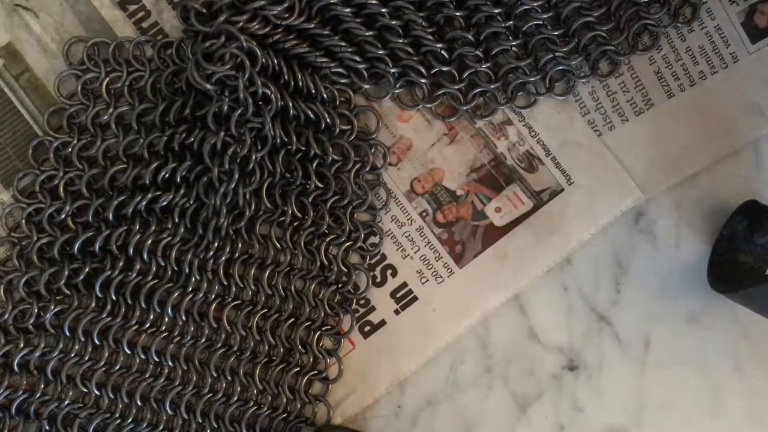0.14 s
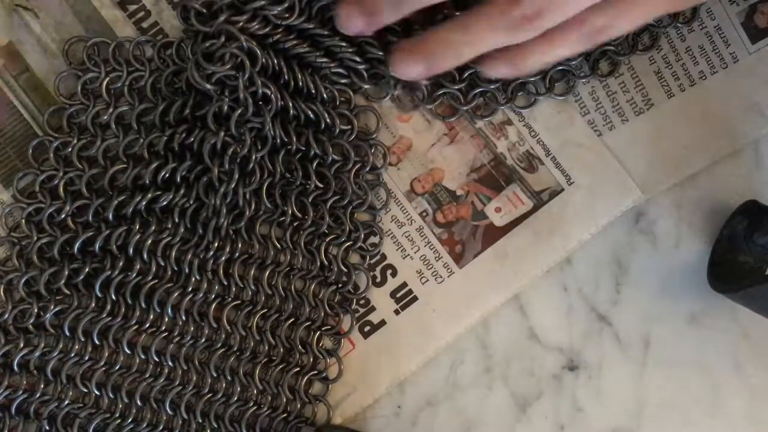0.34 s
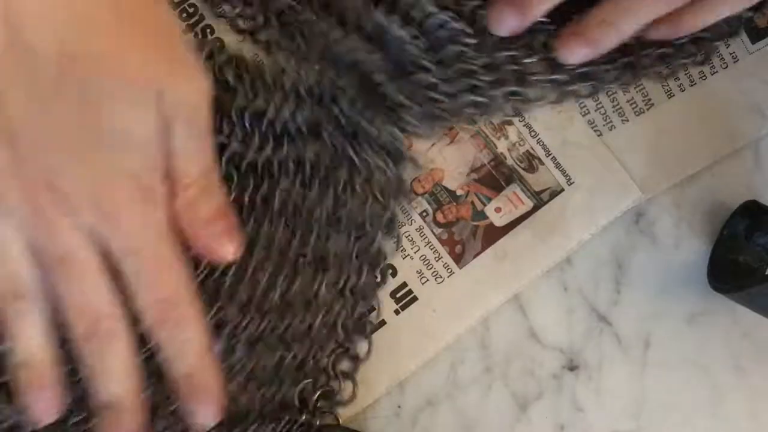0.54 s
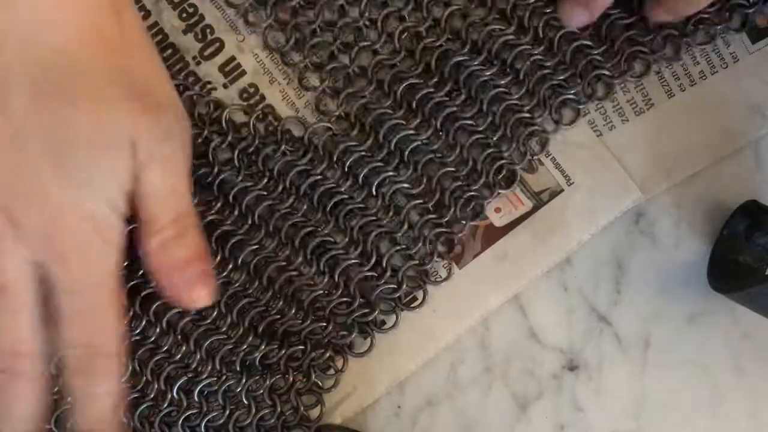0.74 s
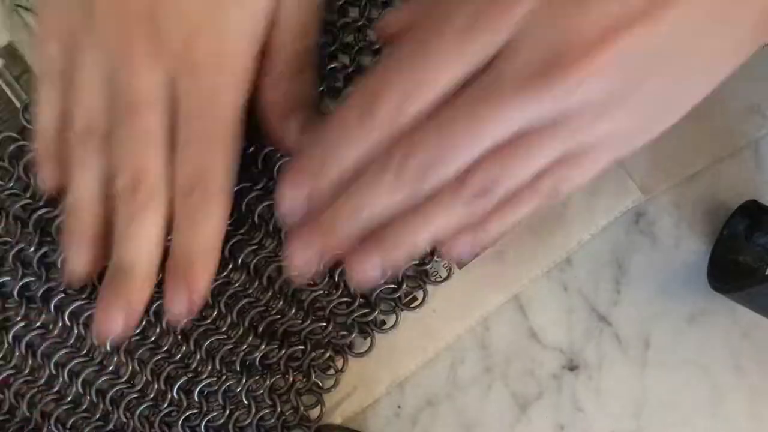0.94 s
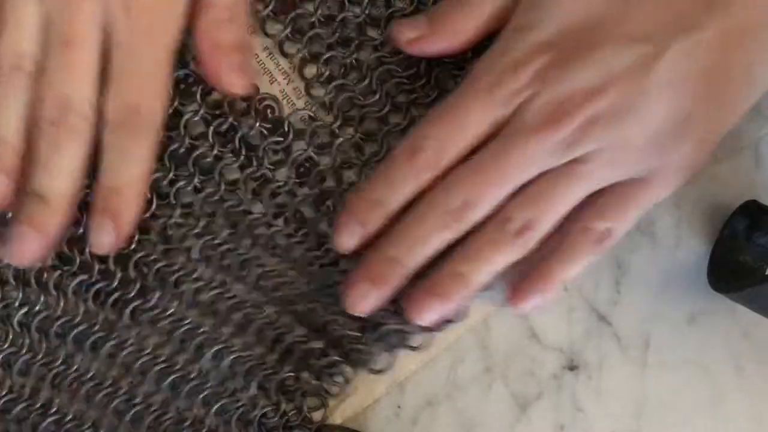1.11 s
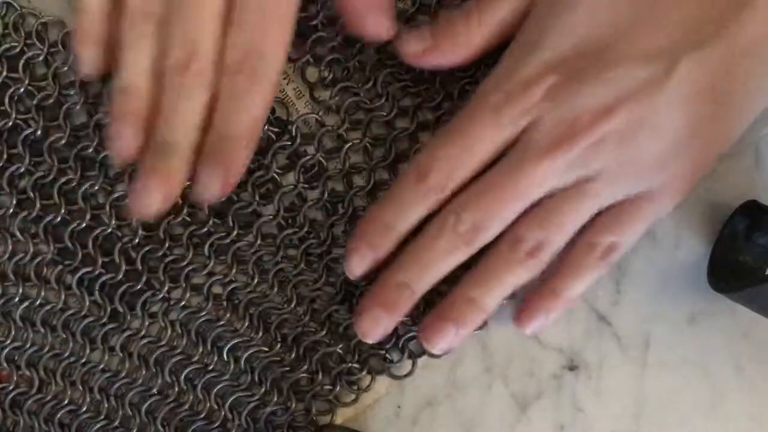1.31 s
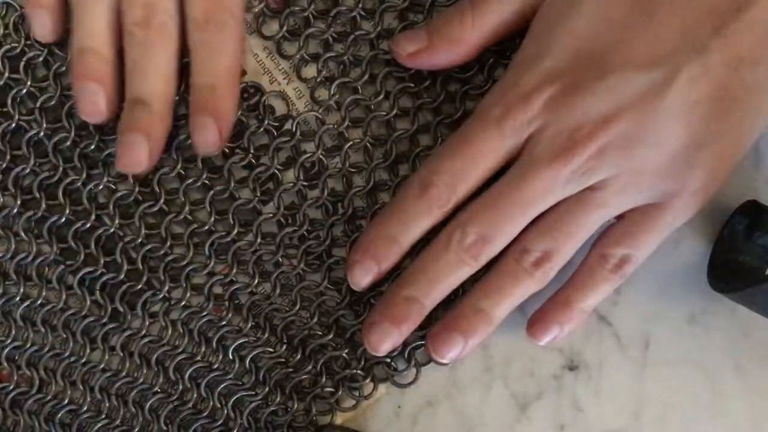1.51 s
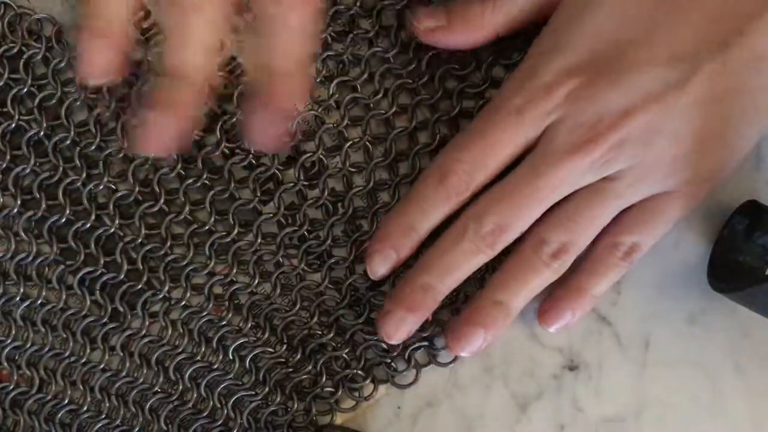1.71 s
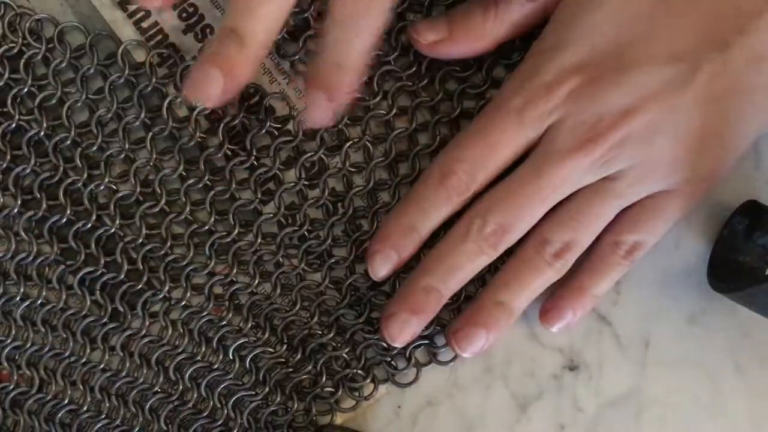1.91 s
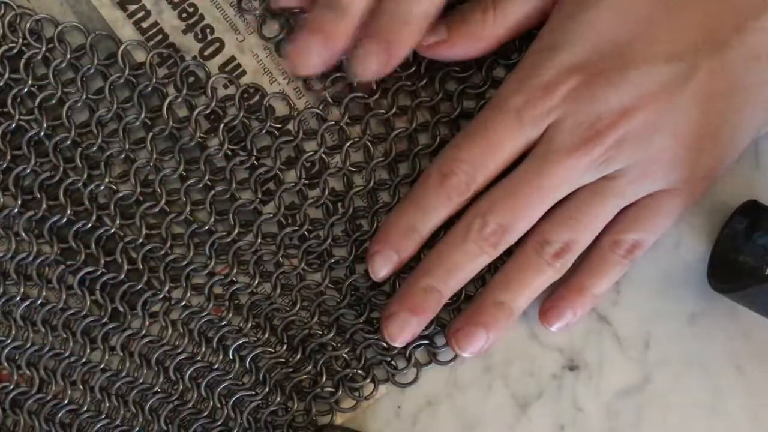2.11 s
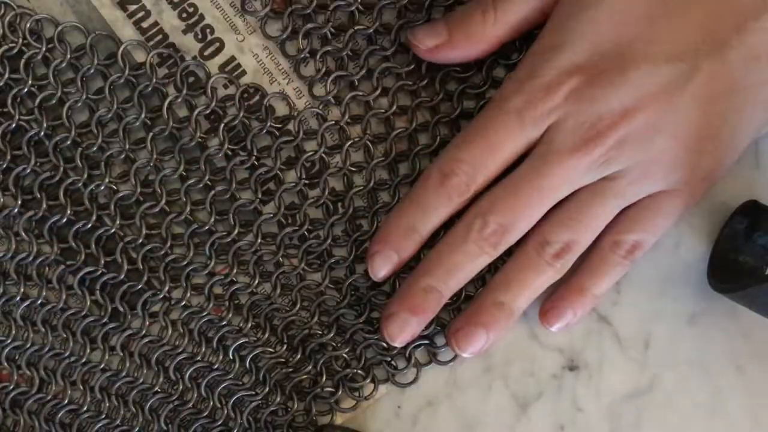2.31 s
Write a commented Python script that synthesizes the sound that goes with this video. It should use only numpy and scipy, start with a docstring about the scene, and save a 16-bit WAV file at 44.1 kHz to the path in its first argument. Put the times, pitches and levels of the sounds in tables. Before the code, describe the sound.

Chain mail drops with a metallic clack, then rustles and clicks as hands spread it.

```python
"""Hands spread chain mail over newspaper on a stone counter, close by in a small room with a faint hum.
A few rings click, then a fold of mesh drops at 0.24 s: steel clacks, the counter thuds, the rings rattle.
From 0.45 s three strokes drag the mesh: ring contacts hiss, the paper rustles, palms press down softly.
Links scrape, clink and slip along the way; at 2.23 s one taut ring snaps into place."""
import sys
import numpy as np
from scipy import signal
from scipy.fft import rfft, irfft, next_fast_len
from scipy.io import wavfile

SR = 44100
rng = np.random.default_rng(int(sys.argv[2]) if len(sys.argv) > 2 else 0)


def store_wav(level_fs):
    """Save 16-bit WAV to argv[1]."""
    pcm = np.round(np.clip(np.atleast_2d(level_fs), -1, 1) * 32767)
    wavfile.write(sys.argv[1], SR, pcm.T.astype(np.int16))


N = 103635

# Spectra. Each row: frequency in Hz, relative level in dB.
RUB_SPECTRUM = [(1200, -32.5), (3000, -13.5), (5000, -13), (6700, -3.5), (7400, -10), (8500, -3),
                (9700, -2), (10300, -10), (11400, -0.5), (12200, -2.5), (12750, 2), (13600, -2),
                (15500, -4)]  # rings rubbing
PAPER_SPECTRUM = [(250, -1), (600, 3), (1000, -2.5), (1900, 1), (3300, -0.5), (4800, -6.5), (8000, -9),
                  (15000, -48.5)]  # newspaper rustling
CLICK_SPECTRUM = [(1000, -28.5), (3000, -11.5), (5000, -12), (7500, -4.5), (10200, -5), (11300, -1),
                  (12700, -1.5), (14000, -7), (16000, -8)]  # one ring striking others
CLATTER_SPECTRUM = [(500, -8.5), (1700, -4.5), (4300, -2.5), (5800, 2.5), (12000, -4.5), (15500, -14)]  # many rings striking together

LAND_S, SNAP_S = 0.2401, 2.2342
LAND_RISE_S, CLICK_RISE_S = 0.00049, 0.00044


def amp(db):
    """Decibels to gain."""
    return 10 ** (np.asarray(db) / 20)


def unit(x):
    """Scale to rms 1."""
    return x / np.sqrt(np.mean(x ** 2) + 1e-20)


def along(points, hz):
    """Interpolate (Hz, value) points on a log frequency axis."""
    point_hz, values = np.transpose(points)
    return np.interp(np.log(hz + 1), np.log(point_hz + 1), values)


def clock():
    """Sample times in seconds."""
    return np.arange(N) / SR


def noise():
    """White noise of rms 1."""
    return rng.standard_normal(N)


def colour(x, spectrum):
    """Minimum-phase filter from (Hz, dB) points; white noise keeps its power."""
    size = 2 * next_fast_len(N)
    gain = unit(amp(along(spectrum, np.fft.rfftfreq(size, 1 / SR))))
    cepstrum = irfft(np.log(gain + 1e-6))
    cepstrum[1:size // 2] *= 2
    cepstrum[size // 2 + 1:] = 0
    return irfft(rfft(x, size) * np.exp(rfft(cepstrum)))[:N]


def resonate(x, modes):
    """Parallel (Hz, width Hz, dB) resonances of alternating sign; white noise keeps its power."""
    size = 2 * next_fast_len(N)
    f = np.fft.rfftfreq(size, 1 / SR)
    body = sum((-1) ** k * amp(db) * 1j * f * width_hz / (hz * hz - f * f + 1j * f * width_hz)
               for k, (hz, width_hz, db) in enumerate(modes))
    return irfft(rfft(x, size) * body / np.sqrt(np.mean(np.abs(body) ** 2)), size)[:N]


def fade(t, t60_s):
    """Exponential decay from t = 0."""
    return np.exp(-np.log(1000) * np.maximum(t, 0) / t60_s)


def strike(start_s, rise_s, t60_s):
    """Impact envelope: exponential rise and decay."""
    t = np.maximum(clock() - start_s, 0)
    return (1 - np.exp(-t / rise_s)) * fade(t, t60_s)


def swell(peak_s, rise_s, t60_s):
    """Soft envelope: Gaussian rise, exponential decay."""
    t = clock() - peak_s
    return np.exp(-0.5 * (np.minimum(t, 0) / rise_s) ** 2) * fade(t, t60_s)


def swells(rows):
    """Power sum of swells."""
    power = sum((amp(db) * swell(peak_s, rise_s, t60_s)) ** 2 for peak_s, db, rise_s, t60_s in rows)
    return np.sqrt(power)


def contacts(per_s, spread_db):
    """Random tiny impacts of uneven size, with even mean power."""
    chance = np.clip(per_s / SR, 1e-4, 1)
    hits = (rng.random(N) < chance) * np.sign(noise())
    sizes = amp(spread_db * np.clip(noise(), -2, 2))
    return unit(hits * sizes / np.sqrt(chance))


def ringing(start_s, rise_s, modes):
    """Struck modes: decaying sines of random phase."""
    t = clock() - start_s
    return sum(amp(db) * strike(start_s, rise_s, t60_s) * np.sin(2 * np.pi * (hz * t + rng.random()))
               for hz, db, t60_s in modes)


def background():
    """Low room noise and mains hum."""
    # Each row: frequency in Hz, level in dB (relative for the air, rms for the hum).
    air_spectrum = [(25, -23), (70, -1), (110, -1.5), (150, -9), (220, -3.5), (420, -17), (800, -20),
                    (1700, -25), (4500, -35.5), (10000, -36.5), (15500, -45)]
    hum_lines = [(99, -67.5), (200, -75.5)]
    hum = sum(amp(db) * np.sqrt(2) * np.sin(2 * np.pi * (hz * clock() + rng.random()))
              for hz, db in hum_lines)
    return amp(-63.5) * unit(colour(noise(), air_spectrum)) + hum


def sliding():
    """Ring contacts hiss, denser as the mesh slides harder; the paper follows the same motion."""
    # The fold's slump, three strokes, small shifts. Each row: time in seconds, sliding level in dB.
    motion = [(0, -73), (.09, -70.5), (.17, -62), (0.199, -65.5), (.26, -47), (.31, -63), (.40, -72),
              (.45, -62.5), (0.525, -50.5), (.696, -47.5), (0.761, -52), (.784, -66.5), (.872, -67.5),
              (.9, -76.5), (1.055, -78.5), (1.072, -57.5), (1.096, -48), (1.115, -55), (1.176, -57),
              (1.218, -53.5), (1.27, -62.5), (1.295, -72), (1.4, -85), (1.44, -53), (1.47, -62),
              (1.6, -71.5), (1.71, -70.5), (1.76, -89.5), (1.95, -77.5), (2.001, -81), (2.35, -81.5)]
    full_slide_db, smooth_share = -44.5, 0.95
    slide_db = np.interp(clock(), *np.transpose(motion))
    effort_db = slide_db - full_slide_db
    grains = contacts(per_s=9600 * amp(1.96 * effort_db), spread_db=9)
    rub = np.sqrt(1 - smooth_share) * grains + np.sqrt(smooth_share) * noise()
    rings = colour(rub * amp(slide_db + 2), RUB_SPECTRUM)
    paper = colour(noise() * amp(-61 + 0.6 * effort_db), PAPER_SPECTRUM)
    return rings + paper


def clicks():
    """A ring snaps against its neighbours and taps the counter; the neighbours rattle on."""
    # Each row: start in seconds, bright level in dB, dull level in dB.
    events = [(0.053, -37.5, -42.5), (.175, -46, -56), (0.214, -44, -47), (0.2349, -29.5, -46),
              (0.24, -20, -28.5), (0.2529, -35, -45), (0.265, -27.5, -42), (0.4278, -46.5, -38.5),
              (.902, -65.5, -57), (1.084, -49, -56), (1.0938, -38.5, -44), (1.4312, -45, -43.5),
              (1.697, -47.5, -76.5), (1.8092, -52, -58), (1.877, -43.5, -51.5), (2.2342, -43.5, -40.5)]
    # Dull tap on the counter. Each row: frequency in Hz, relative level in dB.
    tap_spectrum = [(100, -15.5), (250, 12), (600, -8.5), (950, 4.5), (1700, 1), (2300, 5), (4200, -1.5),
                    (7000, -8), (15000, -42.5)]
    bright, dull = np.zeros(N), np.zeros(N)
    for start_s, bright_db, dull_db in events:
        rattle = amp(-17.5) * strike(start_s, CLICK_RISE_S, t60_s=0.031)
        envelope = strike(start_s, CLICK_RISE_S, t60_s=0.012) + rattle
        bright += amp(bright_db) * envelope
        dull += amp(dull_db) * envelope
    ticks = colour(bright * np.sign(noise()), CLICK_SPECTRUM)
    return ticks + colour(dull * np.sign(noise()), tap_spectrum)


def counter():
    """Hard landings ring the counter's low modes over a diffuse thud; resting hands shorten the ring."""
    # Each row: start in seconds, level in dB, share of the free decay time.
    knocks = [(0.24, -32.5, 1), (0.273, -49.5, 0.85), (0.43, -46, 0.85), (2.2344, -50.5, .45)]
    # Each row: frequency in Hz, relative level in dB, free t60 in seconds.
    stone_modes = [(90.7, -5, 0.33), (163.2, -14, 0.53), (205.6, -10.5, 0.56), (238.8, -7.5, .35),
                   (266.5, -2, 0.31), (303.4, -5.5, .15), (574, -11.5, 0.11)]
    # Each row: frequency in Hz, relative level in dB.
    thud_spectrum = [(30, -35), (80, 3), (260, -2), (370, -1.5), (460, -13.5), (700, -16), (1500, -20.5),
                     (6000, -81)]
    ring, thud = np.zeros(N), np.zeros(N)
    for start_s, db, share in knocks:
        damped = [(hz, mode_db, t60_s * share) for hz, mode_db, t60_s in stone_modes]
        ring += amp(db) * ringing(start_s, rise_s=0.00021, modes=damped)
        thud += amp(db - 7.5) * strike(start_s, rise_s=0.00081, t60_s=0.49 * share)
    return ring + colour(thud * noise(), thud_spectrum)


def clack():
    """The fold lands with a broad crack."""
    envelope = strike(LAND_S, LAND_RISE_S, t60_s=0.0075)
    return amp(-15) * colour(np.sign(noise()) * envelope, CLATTER_SPECTRUM)


def steel():
    """Ring modes struck by the landing and by the last snap, choked at once by the mesh."""
    # Each row: frequency in Hz, relative level in dB, t60 in seconds.
    landing_modes = [(1680, -18.5, 0.014), (2220, -10, 0.006), (3375, -7.5, 0.009), (5155, -1.5, .007),
                     (5420, 2, 0.0091), (6180, -10, 0.012), (6500, -8.5, 0.0092), (8250, -3.5, 0.0082),
                     (9000, 2, 0.0059), (11160, -8.5, .007), (11400, -6, 0.0075)]
    taut_modes = [(2356, -8.5, 0.01), (4110, -7, 0.0072), (5680, -1, 0.0077), (7820, -0.5, 0.0078),
                  (12500, 3.5, 0.0096)]
    landing = amp(-9.5) * ringing(LAND_S, LAND_RISE_S, landing_modes)
    return landing + amp(-30) * ringing(SNAP_S, CLICK_RISE_S, taut_modes)


def settle():
    """The landed rings rattle as they come to rest."""
    rattle = strike(LAND_S, rise_s=0.002, t60_s=0.3) * contacts(per_s=5000, spread_db=5.5)
    return amp(-42.5) * colour(rattle, CLATTER_SPECTRUM)


def scuffs():
    """The newspaper crinkles briefly where the mesh or a finger catches it."""
    # Each row: peak time in seconds, level in dB, rise in seconds, t60 in seconds.
    events = [(.247, -42, 0.0031, 0.35), (1.09, -60, 0.014, 0.11), (1.4, -62.5, 0.012, 0.33),
              (1.438, -56.5, 0.005, 0.075), (2.08, -69, 0.01, .2)]
    return colour(swells(events) * contacts(per_s=4100, spread_db=4.5), PAPER_SPECTRUM)


def clunks_and_scrapes():
    """Hollow clunks and clatter as the mesh lands, then short scrapes as it is dragged."""
    # Each row: peak time in seconds, level in dB, rise in seconds, t60 in seconds.
    events = [(.273, -38, 0.00056, 0.018), (.299, -61, 0.0015, .06), (.43, -48, .0007, 0.054),
              (.575, -57, 0.0031, 0.25), (.70, -60, 0.02, 0.35), (.97, -68.5, 0.016, 0.56),
              (1.615, -59, 0.011, 0.26), (1.885, -67.5, 0.0065, 0.34)]
    # Each row: frequency in Hz, width in Hz, relative level in dB.
    hollow_modes = [(934, 68, 2), (1240, 77, 1.5), (1600, 63, -1.5), (1830, 210, -5), (2290, 100, -4.5),
                    (3430, 460, -9)]
    return resonate(swells(events) * contacts(per_s=3700, spread_db=3.5), hollow_modes)


def pushes():
    """The soft weight of mesh or palm gives a few low cycles and leaves a faint boom."""
    # Each row: peak time in seconds, level in dB, pitch in Hz, rise in seconds.
    events = [(0.291, -39, 69.6, 0.01), (1.105, -48.5, 83.7, 0.012), (1.454, -40.5, 72, 0.0079),
              (2.255, -56, 85, 0.0074)]
    boom_hz = 65.3
    out = np.zeros(N)
    for peak_s, db, hz, rise_s in events:
        rad_per_hz = 2 * np.pi * (clock() - peak_s)
        bump = swell(peak_s, rise_s, t60_s=0.052) * np.cos(hz * rad_per_hz)
        boom = swell(peak_s, rise_s, t60_s=0.74) * np.cos(boom_hz * rad_per_hz)
        out += amp(db) * (bump + amp(-9.5) * boom)
    return out


def clinks():
    """A loose ring chatters against the mesh and rings on."""
    # Each row: start in seconds, level in dB.
    events = [(.573, -50.5), (1.272, -65)]
    # Each row: frequency in Hz, relative level in dB, t60 in seconds.
    free_modes = [(2640, 0.5, 0.088), (3370, -5, 0.14), (4780, 0, 0.13), (6780, 6, 0.045)]
    # Each row: frequency in Hz, width in Hz, relative level in dB.
    chatter_modes = [(2806, 520, -3), (4260, 1300, 1), (6530, 590, -2.5)]
    tone = sum(amp(db) * ringing(start_s, rise_s=0.00084, modes=free_modes) for start_s, db in events)
    touch = sum(amp(db + 1.5) * strike(start_s, rise_s=0.00066, t60_s=0.084) for start_s, db in events)
    return tone + resonate(touch * contacts(per_s=3000, spread_db=2.5), chatter_modes)


def slips():
    """Small groups of links shift under the fingers."""
    # Each row: peak time in seconds, level in dB, rise in seconds, t60 in seconds.
    events = [(1.416, -55, .005, 0.021), (1.636, -60, .003, 0.045), (1.705, -59.5, .007, .06),
              (1.811, -56, .002, 0.056), (1.878, -51, .0012, 0.036), (2.047, -56.5, .003, 0.094)]
    return colour(swells(events) * contacts(per_s=14000, spread_db=4), RUB_SPECTRUM)


def snap():
    """A taut ring snaps into place with a dry tick and stirs its neighbours."""
    tick = strike(SNAP_S, CLICK_RISE_S, t60_s=0.0079)
    stir = amp(-22.5) * strike(SNAP_S, CLICK_RISE_S, t60_s=0.14)
    return amp(-30) * colour(np.sign(noise()) * (tick + stir), CLICK_SPECTRUM)


def room(x):
    """Small-room reverb: a short noise tail whose treble dies first."""
    # Each row: frequency in Hz, t60 in seconds.
    decay_times = [(100, 0.6), (1000, 0.65), (5500, 0.51), (12000, 0.14)]
    hz, t, bins = signal.stft(rng.standard_normal(SR // 2), SR, nperseg=256)
    tail = signal.istft(bins * fade(t, along(decay_times, hz)[:, None]), SR)[1]
    return signal.fftconvolve(x, tail / np.linalg.norm(tail))[:N]


def scene():
    """Mono mix; choked steel modes, pushes and background bypass the reverb."""
    near = sliding() + slips() + scuffs() + clunks_and_scrapes() + clicks() + clinks()
    near += clack() + settle() + snap() + counter()
    return (near + amp(-15.5) * room(near) + steel() + pushes() + background())[None]


def record(dry):
    """Brick-wall low-pass."""
    cutoff_hz = 16000
    size = next_fast_len(N + SR // 2)
    passband = np.fft.rfftfreq(size, 1 / SR) < cutoff_hz
    return irfft(rfft(dry, size) * passband, size)[..., :N]


dry = scene()
out = record(dry)
store_wav(out)
```